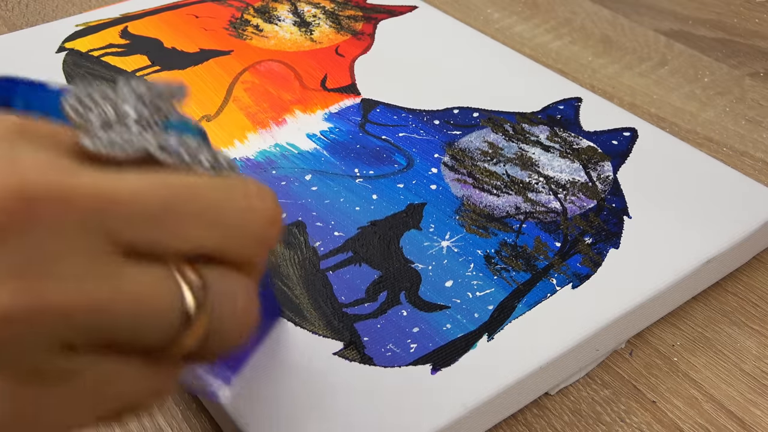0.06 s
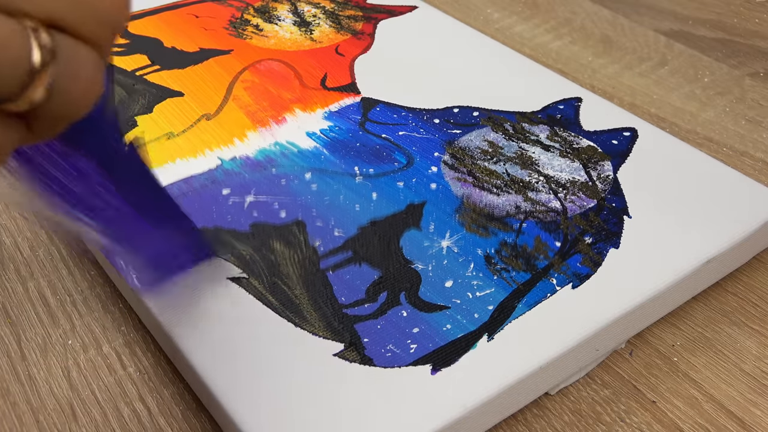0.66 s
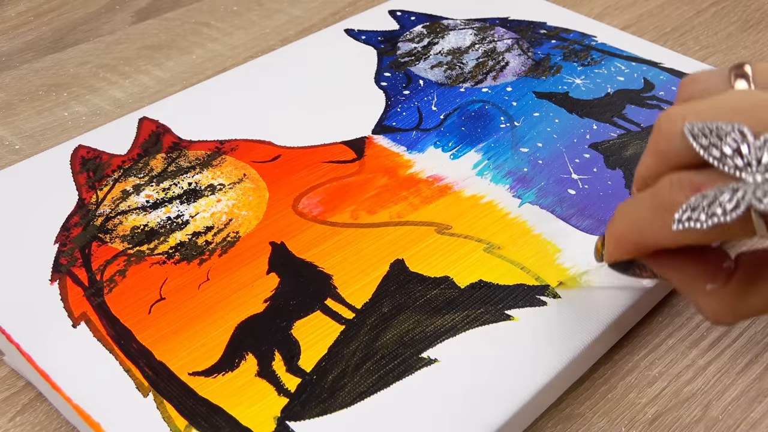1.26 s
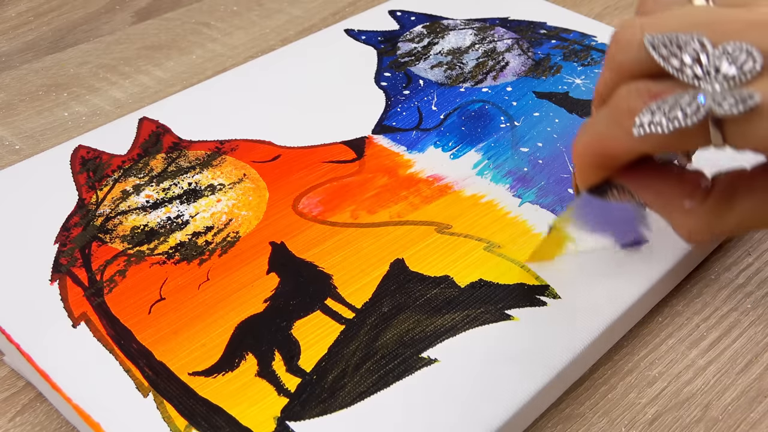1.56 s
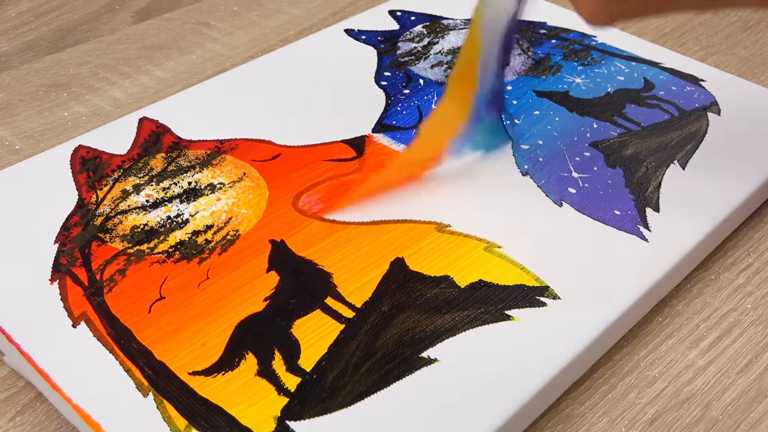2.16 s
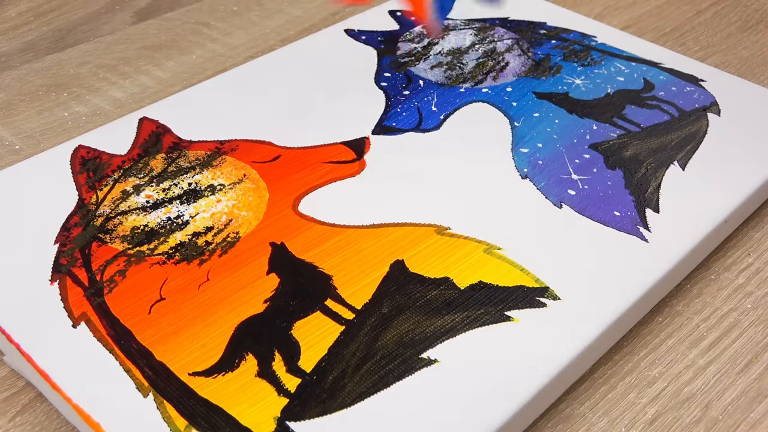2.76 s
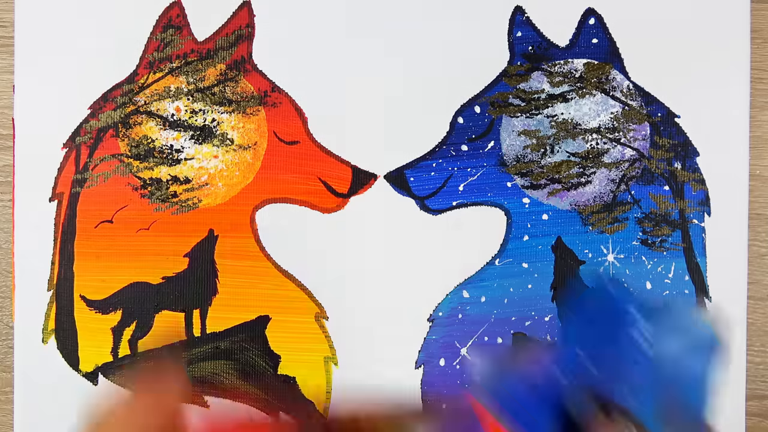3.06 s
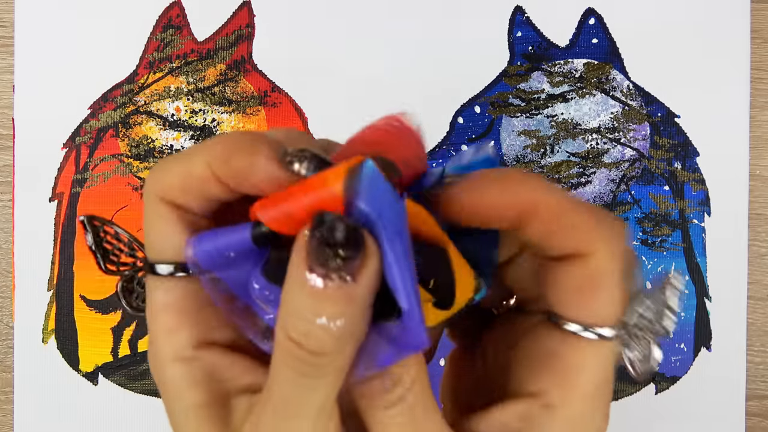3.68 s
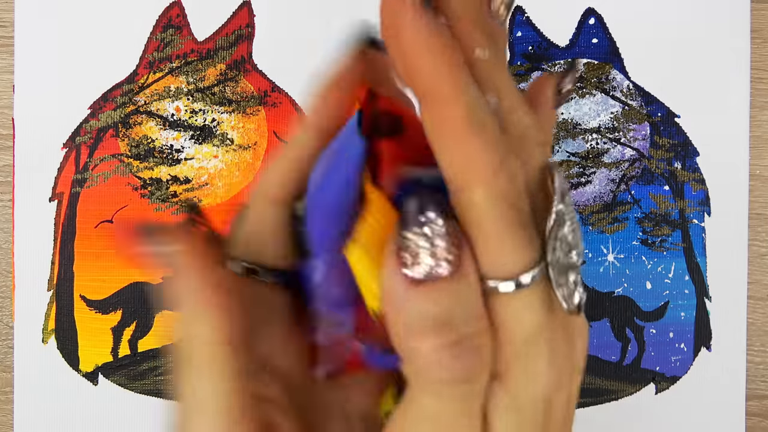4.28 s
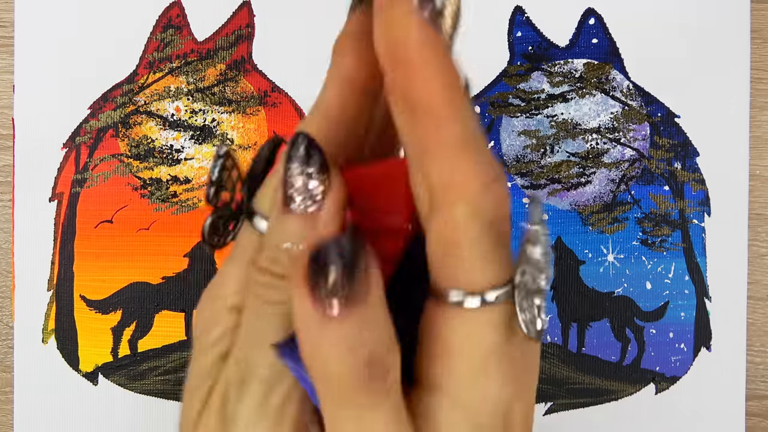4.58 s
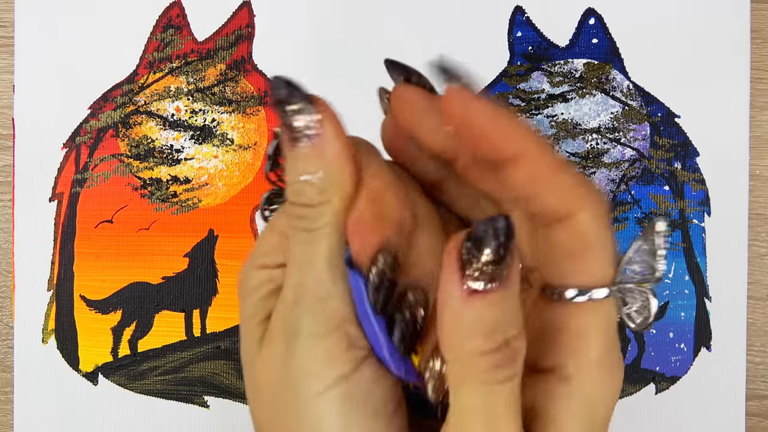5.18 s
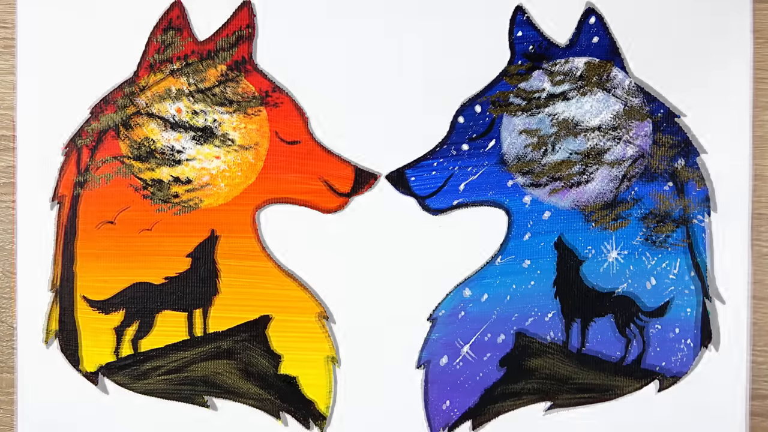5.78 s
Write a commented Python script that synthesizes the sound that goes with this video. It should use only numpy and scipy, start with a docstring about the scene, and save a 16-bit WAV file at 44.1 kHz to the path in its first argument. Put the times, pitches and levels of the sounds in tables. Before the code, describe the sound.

Close to the microphone in a small room, tape comes away from a canvas with a loud, uneven rip that breaks off briefly between pulls. The taut cloth resonates with each tug, and the last pull ends in low thumps. A moment later the tape is scrunched between the palms, crackling and snapping continuously, then thinning to a light creak. A fingernail ticks softly at the end.

```python
"""A small room, where painted masking tape is peeled off a stretched canvas in four pulls, then balled up.
The glue lets go in quick uneven slips: each cracks in the tape and tugs the canvas, which sounds like
a small drum. Creases snap as the hands crush the tape, and a fingernail ticks as they withdraw.
The room rings on, and the close microphone overloads on the loudest snaps."""
import sys
import numpy as np
from scipy import signal
from scipy.fft import rfft, irfft
from scipy.io import wavfile
from scipy.ndimage import uniform_filter1d

SR = 44100
rng = np.random.default_rng(int(sys.argv[2]) if len(sys.argv) > 2 else 0)


def int16_out(signal):
    """Quantize to a 16-bit WAV file."""
    q = np.round(np.clip(np.atleast_2d(signal).T, -1, 1) * 32767)
    wavfile.write(sys.argv[1], SR, q.astype(np.int16))


N = 261491
T = np.arange(N) / SR


def undb(db):
    """Decibels to gain."""
    return 10 ** (np.asarray(db) / 20)


def unit(x):
    """Scale to unit energy along the last axis."""
    return x / np.sqrt(np.sum(x ** 2, axis=-1, keepdims=True) + 1e-18)


def along(points, hz):
    """Read (Hz, value) points on a log-frequency axis."""
    point_hz, value = np.transpose(points)
    return np.interp(np.log(hz + 1), np.log(point_hz), value)


def follow(curves, times, column=1):
    """Ride a fader along dB curves: the gain at each time, silent outside them."""
    return sum(undb(np.interp(times, rows[:, 0], rows[:, column], left=-200, right=-200))
               for rows in map(np.array, curves))


def ring(x, response):
    """Pass a sound through an impulse response."""
    return signal.fftconvolve(x, response)[:N]


def colour(eq, size=4096):
    """Causal impulse response of an EQ curve."""
    gain = undb(along(eq, np.fft.rfftfreq(size, 1 / SR)))
    cepstrum = irfft(np.log(gain))
    cepstrum[1:size // 2] *= 2
    cepstrum[size // 2 + 1:] = 0
    return irfft(np.exp(rfft(cepstrum)))


def body(modes):
    """Impulse response of damped modes; dB sets the energy of each."""
    t = T[:SR // 4]
    swings = (np.exp(-np.pi * width * t) * np.sin(2 * np.pi * hz * t) for hz, width, _ in modes)
    # the air follows the speed of the surface, so a push leaves no low thump
    return sum(undb(db) * unit(np.diff(swing)) for swing, (_, _, db) in zip(swings, modes))


def place(times, sizes, shapes=np.ones(1)):
    """Lay one shape (by default a pulse) at each time."""
    waves = sizes[:, None] * shapes
    index = np.maximum(times * SR, 0).astype(int)[:, None] + np.arange(waves.shape[1])
    return np.bincount(index.ravel(), waves.ravel(), N)[:N]


def slips(curves, per_s, scatter_db, column=1, count=6000):
    """Times and sizes of uneven slips, whose short-term power follows the dB curves."""
    times = np.cumsum(rng.gamma(2, 1 / 2, count)) / per_s
    sizes = undb(scatter_db * rng.standard_normal(count))
    times, sizes = times[times < T[-1]], sizes[times < T[-1]]
    power = uniform_filter1d(place(times, sizes ** 2), size=2600)
    levelled = sizes / np.sqrt(power[(times * SR).astype(int)] + 1e-12)
    return times, levelled * follow(curves, times, column)


def pitches(times, centre_hz, octaves):
    """A scattered pitch for each small patch of tape that cracks."""
    return centre_hz * 2 ** (octaves * rng.uniform(-1, 1, len(times)))


def cracks(times, sizes, hz, rise_s, fall_s, q, order=1, size=320):
    """Fibres give way in a tiny swelling, dying burst and ring a small, damped patch of tape."""
    peak_s = size / 3 / SR
    t = T[:size] - peak_s
    tear = rng.standard_normal((len(hz), size)) * np.exp(np.minimum(t / rise_s, -t / fall_s))
    ratio = 1j * np.fft.rfftfreq(size, 1 / SR) / hz[:, None]
    patch = (ratio / (1 + ratio / q + ratio ** 2)) ** order  # a stiff fold (order 2) has steeper skirts
    return place(times - peak_s, sizes, unit(irfft(rfft(tear) * patch)))


def splinter(times, sizes, hz, count=3, delay_s=.004, small_db=-14.5):
    """Add a few small cracks of about the same pitch to each large one, mostly just after it."""
    chance = rng.standard_normal((len(times), 2, count))
    small_times = times[:, None] + delay_s * (1 + chance[:, 0])
    small_sizes = np.repeat(sizes * undb(small_db), count)
    small_hz = hz[:, None] * 2 ** (0.35 * chance[:, 1])
    return np.append(times, small_times), np.append(sizes, small_sizes), np.append(hz, small_hz)


# Tone of the quiet room. Each row: frequency in Hz, relative level in dB.
AIR_EQ = [(25, -27.5), (70, 1.5), (98, 14.5), (130, -3), (400, -1.5), (1500, -8), (5000, -15),
          (16000, -18.5)]

def room_tone(level_db=-69.5):
    """A faint, steady bed of air with a low rumble."""
    return undb(level_db) * ring(rng.standard_normal(N), unit(colour(AIR_EQ)))


# How freely the canvas gives under the peeling point. Each row: time in seconds, give in dB.
CANVAS_GIVE = [(0, 4), (0.6, -27), (0.72, 10.5), (1.2, -18.5), (1.66, -6.5), (1.73, 3.5), (1.93, 11.5),
               (2.12, -1), (2.32, -4.5)]

def pull(effort, per_s, scatter_db, centre_hz, crackle_db, tug_db, boom_db, fizz_db):
    """Every slip cracks in the tape, and tugs and heaves the canvas; threads of glue fizz in between."""
    times, sizes = slips(effort, per_s, scatter_db)
    hz = pitches(times, centre_hz, octaves=.8)
    crackle = cracks(times, sizes * undb(crackle_db), hz, rise_s=.00015, fall_s=.00035, q=.9)
    give_db = np.interp(times, *np.transpose(CANVAS_GIVE))
    tugs = place(times, sizes * undb(tug_db + 0.32 * give_db))  # the rattle follows the give only partly
    heaves = place(times, sizes * undb(boom_db + give_db))
    times, sizes = slips(effort, per_s=1100, scatter_db=3)
    hz = pitches(times, 5500, octaves=1.3)
    fizz = cracks(times, sizes * undb(fizz_db), hz, rise_s=.0002, fall_s=.0003, q=1)
    return np.array([crackle + fizz, tugs, heaves])


# Ring of the stretched cloth. Each row: pitch in Hz, bandwidth in Hz, relative level in dB.
CANVAS_MODES = [(330, 16, -11.5), (373, 70, -13.5), (482.6, 19, -6.5), (614, 90, -7.5), (792, 81, 8),
                (983, 52, 2.5), (1077, 120, -3.5), (1240, 120, -0.5), (1422, 97, -0.5), (1900, 160, -8.5)]

def canvas(kick_hz, kick_width_hz, modes_db, band_hz):
    """Response to a tug: the spot kicks for a cycle or two, then the whole cloth rings."""
    response = body([(kick_hz, kick_width_hz, 0)]) + undb(modes_db) * unit(body(CANVAS_MODES))
    return unit(signal.sosfilt(signal.butter(2, band_hz, "bandpass", fs=SR, output="sos"), response))


# Accents in the peel. Each row: start in seconds, relative crack level in dB, relative tug level in dB.
GLUE_JERKS = [(0.0162, -27, -12.5), (0.103, -14, -9), (0.2846, -17, -7), (0.297, -17, -10),
              (0.3254, -14, -14), (0.358, -12, -29), (0.4557, -23.5, -20), (0.5739, -25, -35.5),
              (0.65, -6.5, -13.5), (0.6776, -7, -15.5), (0.697, -7, 5.5), (0.7366, -8.5, -1),
              (0.7929, -12, -2), (0.8165, -19.5, 1), (0.9054, -18, -9), (0.9804, -15, -3),
              (1.1245, 0.5, -23), (1.153, -4.5, -8), (1.177, -9.5, -14.5), (1.199, -11, -8.5),
              (1.2145, -6.5, -3.5), (1.256, -1, -0.5), (1.305, 0, -14.5), (1.3168, -6, -5.5),
              (1.3753, -18.5, -20), (1.4156, -18.5, -9), (1.4507, -0.5, -10), (1.547, -17, -0.5),
              (1.561, -20, -2), (1.6208, -5, -17), (1.6703, 0, -15), (1.7376, -5, 2.5), (1.7741, -9.5, 2.5),
              (1.8246, 4.5, -5.5), (1.8563, 4.5, -25), (1.9103, 1, -25), (1.9295, -5.5, 0.5),
              (1.9762, -2, -3.5), (2.102, -19, -2), (2.1446, 0, -1), (2.2256, -2, -5), (2.268, -28, -5),
              (2.3192, -4.5, 1), (2.408, -18.5, -14), (2.4228, -1, 7), (2.4343, -9.5, -0.5),
              (2.4543, -11.5, 4.5), (2.4681, -17.5, 0), (2.4836, -2, 6), (2.495, -22.5, -9),
              (2.5135, -5, 9)]

def jerks(crack_gain_db=16, tug_gain_db=14, centre_hz=6200, db_per_octave=15.5):
    """The glue lets go with a jerk; a harder tug on the canvas frees a larger patch and cracks lower."""
    times, crack_db, tug_db = np.transpose(GLUE_JERKS)
    hz = centre_hz * 2 ** ((crack_db - tug_db) / db_per_octave)
    snaps = cracks(*splinter(times, undb(crack_db + crack_gain_db), hz), rise_s=.0002, fall_s=.0005, q=.9)
    return snaps, place(times, undb(tug_db + tug_gain_db))


# Pulls along the frame and across the middle, one curve a pull. Each row: time in seconds, effort in dB.
EDGE_EFFORT = [
    [(0.005, -24), (0.05, -14.5), (0.15, -25), (0.21, -18), (0.27, -17), (0.31, -36.5), (0.36, -30),
     (0.43, -58), (0.54, -56.5)],
    [(0.59, -44), (0.62, -28.5), (0.68, -36), (0.73, -25.5), (0.88, -23.5), (0.95, -41), (0.985, -15.5),
     (1.02, -54)],
]
MIDDLE_EFFORT = [
    [(1.09, -50.5), (1.21, -19), (1.37, -23), (1.43, -16.5), (1.64, -17.5), (1.74, -22), (1.94, -20.5),
     (2.03, -32.5)],
    [(2.088, -32), (2.099, -10.5), (2.15, -21), (2.21, -16.5), (2.31, -19.5), (2.37, -36)],
]
# Tone of the tape in those two places. Each row: frequency in Hz, gain in dB.
EDGE_EQ = [(250, -29.5), (600, -14), (1100, -1), (1900, -1), (2600, -0.5), (3600, 3), (4200, 1),
           (5300, 4.5), (7500, 0), (11000, 0.5), (15500, -6)]
MIDDLE_EQ = [(300, -27.5), (1000, 19), (1900, 2), (2600, 2.5), (4000, -1), (5300, 0), (7500, 0),
             (11000, -2), (15500, -8.5)]
# Low boom of the canvas. Each row: pitch in Hz, bandwidth in Hz, relative level in dB.
DRUM_MODES = [(72.5, 18, 5.5), (96.6, 27, -8.5), (160, 63, 4.5), (218, 36, -10), (292, 15, -16.5)]

def peel(middle_from_s=1.075):
    """Two dull, rasping pulls along the frame, then two crisp ones across the slack, booming middle."""
    edge = pull(EDGE_EFFORT, per_s=450, scatter_db=3.5, centre_hz=5700,
                crackle_db=-3, tug_db=-0.2, boom_db=-22, fizz_db=-5.5)
    middle = pull(MIDDLE_EFFORT, per_s=390, scatter_db=7.5, centre_hz=8500,
                  crackle_db=2.4, tug_db=-0.25, boom_db=-20.5, fizz_db=-6.5)
    tape, tugs, heaves = edge + middle
    snaps, hard_tugs = jerks()
    tape, tugs = tape + snaps, tugs + hard_tugs
    at_edge = T < middle_from_s
    crackle = ring(tape * at_edge, colour(EDGE_EQ)) + ring(tape * ~at_edge, colour(MIDDLE_EQ))
    # next to the frame the cloth is tight: it rings more and has less low end
    tight = canvas(kick_hz=880, kick_width_hz=280, modes_db=4.5, band_hz=(380, 2180))
    slack = canvas(kick_hz=854, kick_width_hz=310, modes_db=1.5, band_hz=(350, 1800))
    cloth = ring(tugs * at_edge, tight) + ring(tugs * ~at_edge, slack)
    boom = ring(heaves, unit(body(DRUM_MODES)))
    return crackle + cloth + boom


# The zip of a fresh end of tape. Each row: time in seconds, pitch in Hz, level in dB.
LIFT_ZIP = [(1.075, 11200, -18), (1.095, 9200, -17.5), (1.115, 5650, -19), (1.128, 3680, -23),
            (1.142, 2900, -19), (1.16, 2370, -29)]

def lift():
    """The short, taut end rings at each slip; its note falls as the free length grows."""
    times, sizes = slips([LIFT_ZIP], per_s=310, scatter_db=4, column=2)
    glide_s, glide_hz, _ = np.transpose(LIFT_ZIP)
    return cracks(times, sizes, np.interp(times, glide_s, glide_hz), rise_s=.00004, fall_s=.0001, q=6)


# Handling thuds. Each row: start in seconds, envelope peak in dB, pitch in Hz.
HAND_BUMPS = [(2.271, -19, 171), (2.327, -23, 120), (2.422, -18, 126.3), (2.46, -13, 92), (2.486, -17, 136),
              (2.53, -14, 83), (2.553, -14, 132), (3.032, -22, 330), (3.43, -21.5, 222), (3.939, -22, 168),
              (3.964, -10, 125), (5.305, -28, 132), (5.377, -24, 522), (5.505, -39, 128)]

def bumps(rise_s=0.0018):
    """Soft contact of hand and tape: a brief, low swell."""
    times, db, hz = np.transpose(HAND_BUMPS)
    t = T[:SR // 8]
    swell = t / rise_s * np.exp(1 - t / rise_s)
    return place(times, undb(db), swell * np.sin(2 * np.pi * hz[:, None] * t))


# How hard the hands squeeze. Each row: time in seconds, effort in dB.
SQUEEZE_EFFORT = [(2.89, -46), (2.925, -22.5), (3.05, -29.5), (3.1, -18.5), (3.2, -37), (3.3, -24),
                  (3.47, -17), (3.61, -22.5), (3.71, -15.5), (3.82, -19.5), (4.12, -15), (4.27, -23),
                  (4.36, -14), (4.49, -20), (4.66, -14.5), (4.8, -18), (5.08, -19), (5.25, -39.5)]
# Large creases buckling. Each row: start in seconds, relative level in dB, pitch in Hz.
CREASE_SNAPS = [(2.911, -13, 5830), (2.9226, -5.5, 5000), (3.0843, -14, 5070), (3.105, -10, 4300),
                (3.243, -13.5, 4470), (3.3203, -4, 3830), (3.5717, -1, 6400), (3.6294, -2, 3500),
                (3.8191, -4.5, 7100), (3.8555, -7.5, 2300), (3.8888, 0, 5740), (3.94, -2, 5800),
                (3.963, -2, 5800), (4.0574, -8, 6300), (4.1302, 3.5, 4800), (4.2848, -8.5, 3900),
                (4.3053, 1, 5700), (4.311, 0, 5830), (4.4465, -1.5, 3900), (4.555, -2, 4940),
                (4.662, -8.5, 3440), (4.7415, -7, 4530), (4.8328, -6.5, 6000), (4.9395, -3.5, 3480),
                (4.9842, -2, 6000), (5.0105, -1, 1940), (5.059, -4, 2450), (5.0811, 1, 3140),
                (5.0901, -6, 2400), (5.1383, -9, 2570), (5.156, -5, 5070), (5.173, -8, 5100),
                (5.1803, -10, 3400), (5.2302, -4.5, 3760), (5.2976, -17, 8500), (5.3032, 0.5, 3600),
                (5.38, -13, 2000), (5.3968, -15, 5900), (5.411, -20, 5700), (5.44, -20, 2000),
                (5.4549, -4.5, 9100), (5.4608, -8.5, 7000), (5.5036, -3.5, 5700)]
# The ball creaks as it is let go. Each row: time in seconds, level in dB.
RELEASE_CREAK = [(5.2, -31), (5.36, -40.5), (5.47, -38), (5.55, -62)]
# Tone of the wad of tape. Each row: frequency in Hz, gain in dB.
WAD_EQ = [(50, -18), (200, -5), (700, 5), (1200, 2.5), (1650, 3), (2100, 0), (3300, 1.5), (5500, 1.5),
          (9000, 1.5), (15500, -3)]

def crumple(coarse_db=-3, fine_db=-3.5, crease_db=14):
    """Creases buckle over a bed of coarse and fine crackle, then the ball creaks as it relaxes."""
    times, sizes = slips([SQUEEZE_EFFORT], per_s=220, scatter_db=6.5)
    hz = pitches(times, 6430, octaves=1.34)
    coarse = cracks(times, sizes * undb(coarse_db), hz, rise_s=.0003, fall_s=.0006, q=1.6)
    times, sizes = slips([SQUEEZE_EFFORT], per_s=800, scatter_db=5)
    hz = pitches(times, 4120, octaves=1.08)
    fine = cracks(times, sizes * undb(fine_db), hz, rise_s=.0006, fall_s=.0008, q=1.6)
    times, sizes = slips([RELEASE_CREAK], per_s=150, scatter_db=7)
    hz = pitches(times, 9300, octaves=.48)
    creak = cracks(times, sizes, hz, rise_s=.00023, fall_s=.00035, q=1.9)
    times, db, hz = np.transpose(CREASE_SNAPS)
    snaps = cracks(*splinter(times, undb(db + crease_db), hz), rise_s=.0004, fall_s=.0007, q=.55, order=2)
    return ring(coarse + fine + creak + snaps, colour(WAD_EQ))


# Muffled tone of the palms. Each row: frequency in Hz, relative level in dB.
PALM_EQ = [(40, -19), (100, -2.5), (190, 5.5), (400, 8), (700, 9), (1300, -19.5), (4000, -25)]

def palm_rub(gain_db=-17.5, balled_s=4.603, fade_db_per_s=84):
    """The squeezed wad rubs dully in the palms, fading once it is a tight ball."""
    times, sizes = slips([SQUEEZE_EFFORT], per_s=400, scatter_db=6)
    fader = undb(gain_db - fade_db_per_s * np.maximum(times - balled_s, 0))
    rubs = place(times, sizes * fader * rng.choice([-1, 1], len(times)))
    return ring(rubs, unit(colour(PALM_EQ)))


# The hollow between the closing hands. Each row: time in seconds, resonance in Hz, mix level in dB.
HAND_HOLLOW = [(2.9, 2470, -3), (3.4, 2420, -2.5), (3.8, 1680, -5.5), (4.3, 1700, 4), (4.7, 1610, 3.5),
               (4.95, 1760, -6), (5.12, 2200, 8), (5.35, 2130, -1), (5.55, 1800, 1.5)]

def cupped(x, width_hz=360):
    """Add the ring of the air held between the palms, whose pitch glides."""
    glide_s, glide_hz, _ = np.transpose(HAND_HOLLOW)
    carrier = np.exp(2j * np.pi * np.cumsum(np.interp(T, glide_s, glide_hz)) / SR)
    pole = np.exp(-np.pi * width_hz / SR)
    # shift down, smooth, shift back up: a sweeping band-pass
    hollow = 2 * np.real(carrier * signal.lfilter([1 - pole], [1, -pole], x / carrier))
    return x + follow([HAND_HOLLOW], T, column=2) * hollow


# Light fingernail taps. Each row: start in seconds, peak level in dB.
NAIL_TAPS = [(5.589, -27), (5.763, -33.5), (5.798, -34.5)]
# Ring of a tap. Each row: pitch in Hz, bandwidth in Hz, relative level in dB.
NAIL_MODES = [(1080, 170, -14), (1717, 55, 6), (1800, 68, 6), (3290, 120, 2), (4020, 720, -29.5)]

def taps(lowpass_hz=3000, scuff_s=0.008, scuff_db=-3):
    """A fingernail ticks and scuffs lightly as the hands withdraw."""
    times, db = np.transpose(NAIL_TAPS)
    t = T[:SR // 20]
    scuff = unit(rng.standard_normal(len(t)) * np.exp(-t / scuff_s))
    touch = (t == 0) + undb(scuff_db) * scuff
    soften = signal.butter(2, lowpass_hz, fs=SR, output="sos")
    tick = signal.sosfilt(soften, ring(touch, body(NAIL_MODES)))
    return place(times, undb(db), tick / np.abs(tick).max())


# Reverb length. Each row: frequency in Hz, seconds to fall by 60 dB.
ROOM_DECAY = [(100, 0.58), (900, 0.34), (3000, 0.34), (7000, 0.39), (15000, 0.15)]
# Tone of the reflections. Each row: frequency in Hz, gain in dB.
WALL_EQ = [(60, -13.5), (300, -3), (900, -4.5), (1800, -3), (3500, -4), (6000, -9.5), (10000, -7.5),
           (16000, -3)]

def reverb(x, wet_db=-7, build_s=0.00067):
    """A small room: echoes build within a few milliseconds, and the top end dies first."""
    t = T[:SR * 3 // 5]
    hz, frame_s, noise = signal.stft(rng.standard_normal(len(t)), SR)
    decay = np.exp(-np.log(1000) * frame_s / along(ROOM_DECAY, hz)[:, None])
    tail = signal.istft(noise * decay, SR)[1][:len(t)]
    tail = unit(tail * (1 - np.exp(-t / build_s)))
    return undb(wet_db) * ring(ring(x, tail), colour(WALL_EQ))


# The level dips briefly, twice. Each row: centre in seconds, depth in dB, half width in seconds.
LEVEL_DIPS = [(1.071, -7.5, 0.021), (2.397, -23, 0.0059)]

def scene():
    """Mix peeling, crumpling and handling with their reverb, over the room tone."""
    peeling = peel() + lift()
    hands = cupped(crumple()) + palm_rub() + taps()
    thuds = bumps()
    # the wad is held nearer the microphone than the canvas lies, so it gets less reverb
    echoes = reverb(peeling + thuds + undb(-3.5) * hands)
    dips = undb(sum(db * np.exp(-((T - centre) / width) ** 2) for centre, db, width in LEVEL_DIPS))
    return ((peeling + hands + thuds + echoes) * dips + room_tone())[None]


def record(dry, low_hz=46, top_hz=16000):
    """The loudest snaps clip at full scale; the deepest rumble and the very top are cut."""
    low_cut = signal.butter(2, low_hz, "highpass", fs=SR, output="sos")
    high_cut = signal.ellip(10, .1, 70, top_hz, fs=SR, output="sos")
    return signal.sosfilt(high_cut, signal.sosfilt(low_cut, np.clip(dry, -1, 1)))


dry = scene()
out = record(dry)
int16_out(out)
```